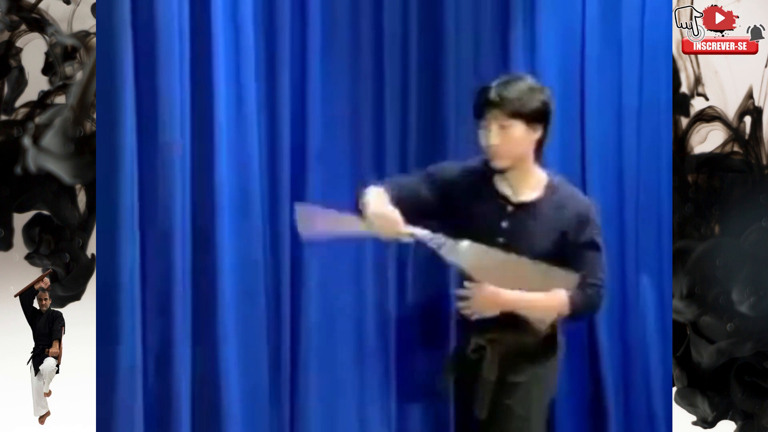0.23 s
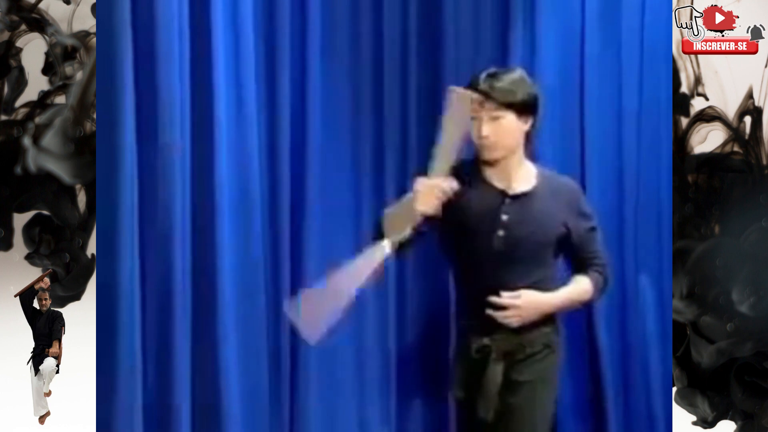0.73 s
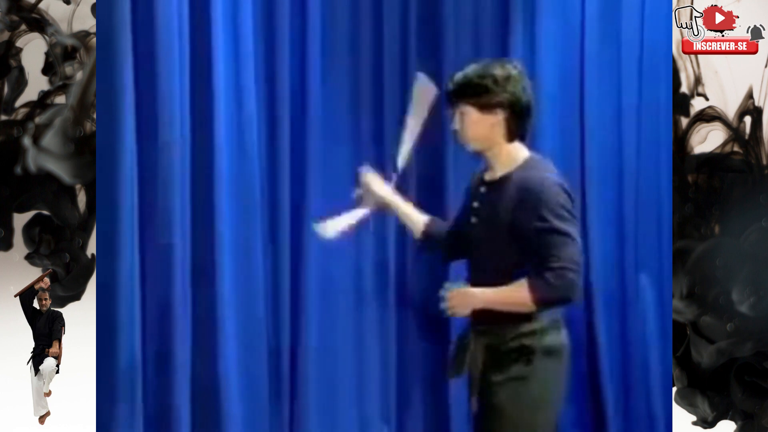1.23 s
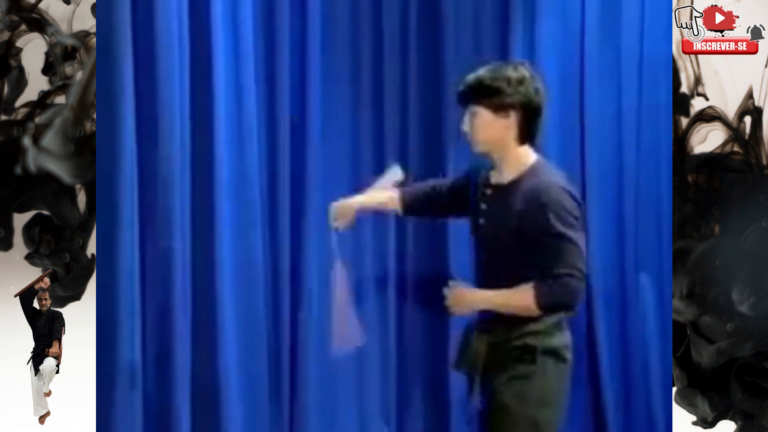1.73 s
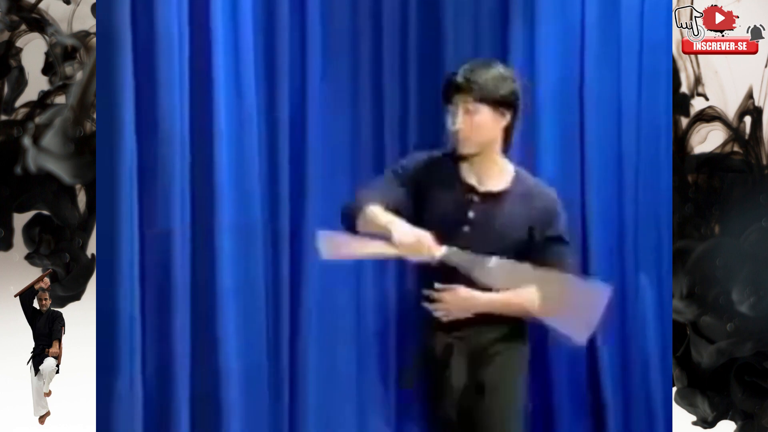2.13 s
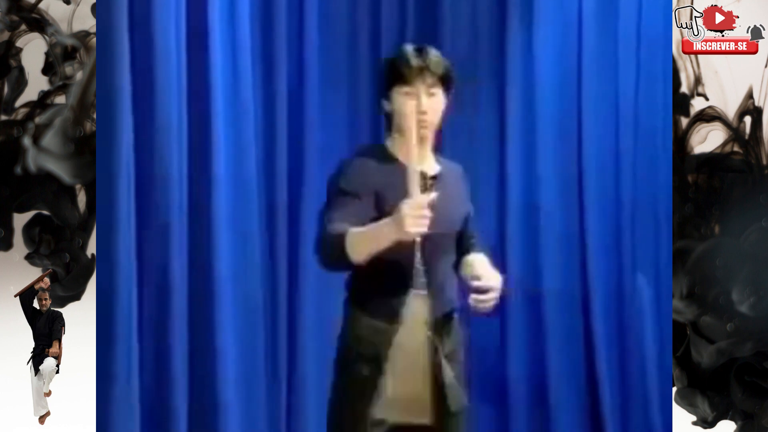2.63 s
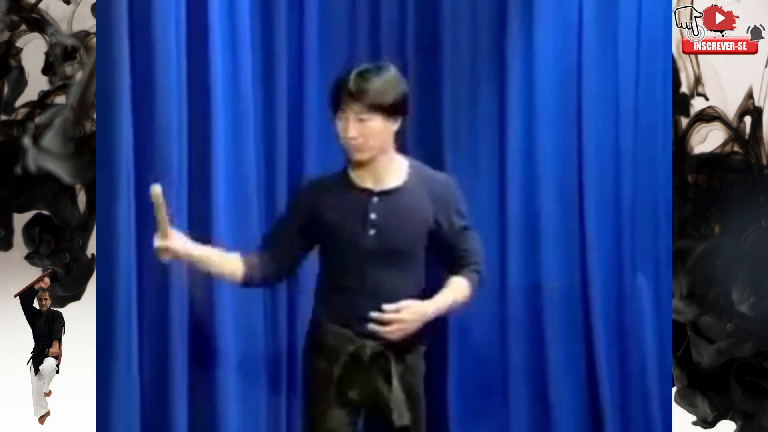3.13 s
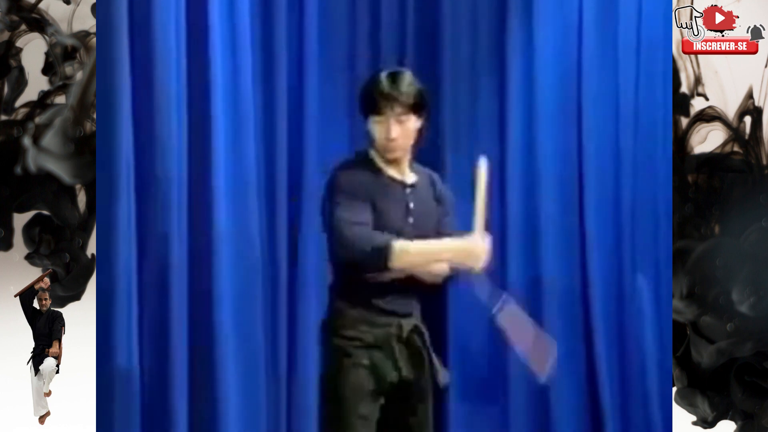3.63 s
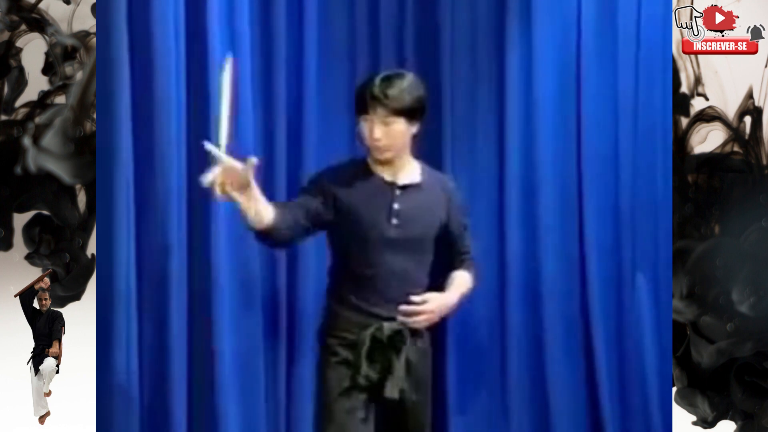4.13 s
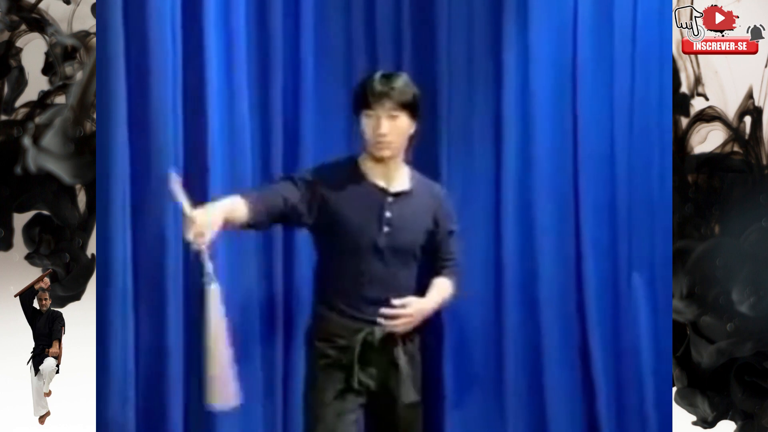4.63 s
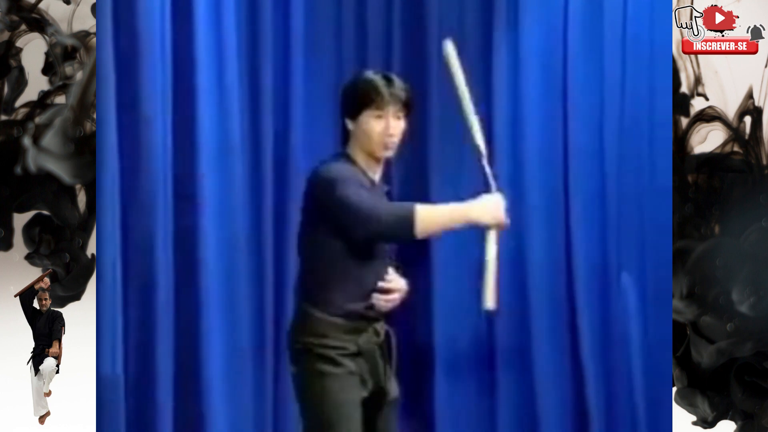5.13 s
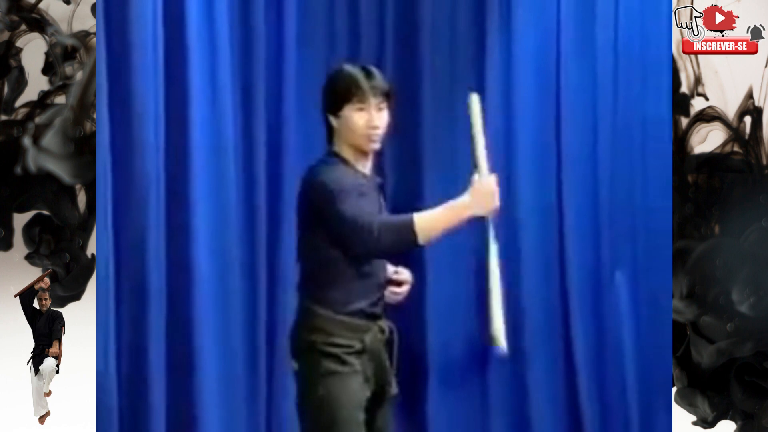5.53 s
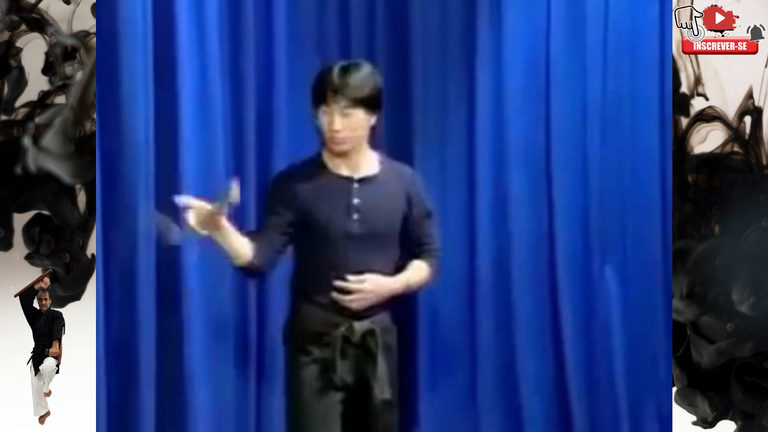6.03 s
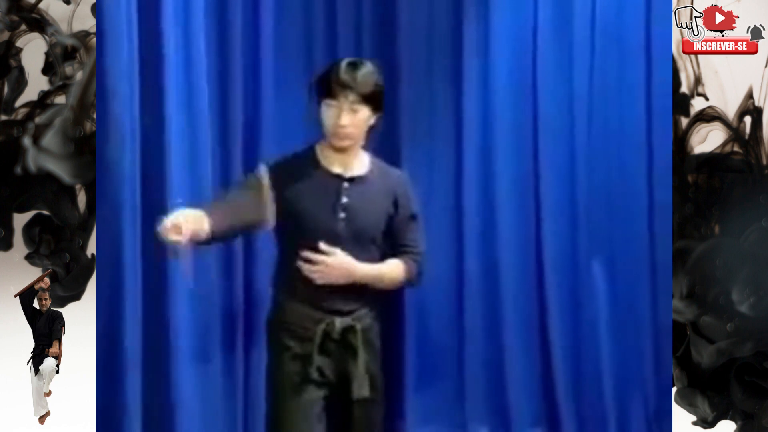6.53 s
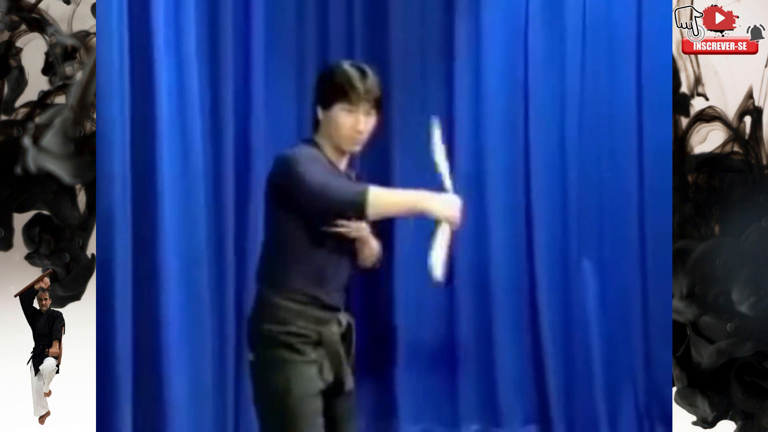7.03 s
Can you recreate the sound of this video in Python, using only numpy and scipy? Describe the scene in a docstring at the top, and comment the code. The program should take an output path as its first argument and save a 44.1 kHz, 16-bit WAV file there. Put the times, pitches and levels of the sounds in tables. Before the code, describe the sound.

A pair of wooden sticks joined by a short chain is swung quickly and caught. Sharp metallic clacks, dry chain rattle and tiny swivel squeaks come in uneven bursts, with occasional soft hand thuds and woody knocks. Brief gaps expose low ventilation noise and mains hum. One fairly close microphone in a small indoor room with short reverberation; the level dips slightly after loud hits.

```python
"""Chain-linked sticks in a curtained room

Two wooden sticks on a short chain are whirled and caught, heard by one microphone.
Swivels squeak by stick-slip; knocks and fine ticks excite resonances of links and wood; the hand thuds softly.
Shaped ventilation noise, mains hum made of sines and white hiss lie beneath.
All of it ducks when the recorder turns its gain down."""
import sys
import numpy as np
from scipy import signal
from scipy.fft import rfft, irfft, next_fast_len
from scipy.io import wavfile
from scipy.ndimage import uniform_filter1d

SR = 44100
rng = np.random.default_rng(int(sys.argv[2]) if len(sys.argv) > 2 else 0)


def wrap_up_sound(samples):
    """Save the sound to the file named by the first command line argument, as 16-bit audio."""
    columns = np.atleast_2d(samples).T
    # keep every value between -1 and 1, then stretch to whole-number steps
    tamed = np.clip(columns, -1, 1)
    steps = np.round(tamed * 32767).astype(np.int16)
    wavfile.write(sys.argv[1], SR, steps)


N = 320607  # samples

# Ventilation spectrum, shape only: (frequency [Hz], relative density [dB per Hz])
AIR_SPECTRUM = [(20, -15), (30, -25), (121, 0), (273, -9.5), (345, -2.5), (632, -8.5), (962, -8),
                (1500, -19.5), (3060, -17.5), (6900, -83)]
# Mains hum at the microphone: (frequency [Hz], rms level [dB])
HUM_PARTIALS = [(30, -54.5), (60, -43.5), (120, -41), (180, -51), (240, -52.5), (1440, -52.5)]
# Jerks that shake the chain loose, before the trims in rattle():
# (time [s], treble level [dB], chain ring over treble [dB], treble settling rate [dB/s])
JERKS = [(0.0, -27, 1.5, 83), (0.21, -36, 4, 103.5), (0.289, -30.5, -6, 262), (0.489, -35.5, 3, 150),
         (0.59, -42.5, 4, 98), (1.025, -21, -3.5, 240), (1.156, -19, -4.5, 202), (1.225, -32, -4.5, 96),
         (1.541, -25, 8.5, 238), (1.72, -29, -1.5, 54), (1.848, -23.5, -6.5, 85), (2.07, -32, -1, 400),
         (2.201, -36, -2.5, 68.5), (2.272, -36, -25, 123), (2.488, -35.5, 4.5, 267), (2.799, -36, 3.5, 397),
         (2.938, -31, 2.5, 73), (3.027, -14.5, -6, 166), (3.34, -71.5, 26.5, 60), (3.482, -45, 2, 40),
         (3.63, -23, -7, 356), (3.78, -70, 3, 246), (3.879, -36.5, 1.5, 270), (4.0, -52.5, 13.5, 94),
         (4.169, -49.5, 7.5, 114), (4.43, -31, 2, 32), (4.708, -18, -3.5, 233), (4.86, -31, 1, 70),
         (4.976, -38.5, 7, 120), (5.06, -33.5, -5, 120), (5.118, -33, -2, 100), (5.199, -34.5, -19, 50),
         (5.36, -30.5, 3, 144), (5.672, -39, -0.5, 17), (5.839, -37, 10.5, 211), (5.957, -20.5, -6, 106),
         (6.2, -45, 8, 93), (6.378, -31, 3, 63), (6.64, -26, 0.5, 99.5), (6.678, -25.5, -5, 202),
         (6.73, -29, -1.5, 165), (6.82, -35, -11, 93), (6.938, -29, 3.5, 128), (7.05, -28.5, -4, 116),
         (7.22, -39, 5.5, 100)]
# Link resonances, values for one pass of the filter: (frequency [Hz], width [Hz], gain [dB])
CHAIN_MODES = [(2157, 1130, -1), (2429, 774, 4.5), (3856, 1680, 6.5), (4740, 1170, -5), (5510, 476, -1)]
# High link resonances, likewise: (frequency [Hz], width [Hz], gain [dB])
HIGH_LINK_MODES = [(6190, 730, 3), (7840, 530, 4), (8540, 1200, 5), (9780, 2130, -0.5), (11100, 930, -13),
                   (12140, 3800, -2)]
# Stick resonances, likewise: (frequency [Hz], width [Hz], gain [dB])
WOOD_MODES = [(562, 100, 2.5), (755, 94, 4), (934.5, 131, 4), (1296, 640, -3.5)]
# The hand closing on a stick: (time [s], level [dB], pitch [Hz])
THUDS = [(2.033, -25, 367), (2.848, -14, 420), (3.518, -4.5, 460), (4.4, -21, 228), (4.7, -19.5, 427),
         (5.332, -17.5, 514), (6.352, -16.5, 350), (6.716, -18.5, 412)]
# Links and caps knocking, before the trims in clacks():
# (time [s], treble level [dB], chain ring over treble [dB], wood over treble [dB])
CLACKS = [(0.0326, 2.5, 7.5, -36), (0.4214, -33, 18, -7), (0.4514, -38, 4, 12), (0.5154, -42, 12, -2),
          (1.0182, -10.5, -10, -39), (1.15, -12, 3, -32), (1.217, -3, -2, -21), (1.304, -26.5, 23, -16),
          (1.501, -30, 27, -14), (1.5273, -14, 9, -29.5), (1.7275, -19.5, 20, -10), (1.7729, -8, 16.5, -32),
          (1.7887, 1, -17, -18), (1.846, -2, 8, -24), (1.9476, -16, 11.5, -0.5), (2.026, -18, 21.5, -6.5),
          (2.1402, -4.5, 4.5, -14), (2.215, -13, 5.5, -14), (2.7908, -18.5, -9, -5.5), (2.916, -6, -2, -12),
          (2.9434, -13.5, 10, -19), (3.013, -2, -14, -31), (3.3313, -23, -9, 6.5), (3.5378, -21, -19, 3.5),
          (3.7713, -14, -44, -11), (3.8754, -18, 4, 1), (3.9052, -24, -4, -7), (4.1495, -37, 23, -9),
          (4.333, -31, 12, -14), (4.4277, -1, 0, -16.5), (4.521, -21, 14, 2), (4.7063, -0.5, 6.5, -36),
          (4.8335, -17, 14, 5), (4.866, -6.5, 4, -11), (4.97, -25, 0, 4), (5.0597, -25.5, 10, 4),
          (5.1221, -19, -5, 5), (5.336, -18.5, 17, 6.5), (5.7786, -30.5, -4, 11), (5.8278, -10, 7, -20),
          (5.9573, -1, -25, -12.5), (6.0076, -1.5, -4, -11), (6.195, -37, 22.5, -2), (6.263, -36, 7, 10),
          (6.3124, -42, -6.5, 24), (6.34, -13.5, 9.5, -6), (6.6811, -9, 8, -25), (6.7232, -5.5, 9, -24),
          (6.9271, -19.5, 15, 4), (7.0536, -20, 14, -27), (7.0806, -20, 4, 7)]
# Spectrum of a knock's crack, shape only: (frequency [Hz], relative level [dB])
CRACK_SPECTRUM = [(1200, -25), (3000, -24), (6000, -5.5), (9000, -11), (11000, -17), (15000, -20.5)]
# Clear slips of swivels and links, before pitch and grip waver:
# (time [s], length before the decay [s], mean pitch [Hz], level of the fundamental [dB])
SQUEAKS = [(0.0, 0.0043, 3280, -14), (0.0, 0.023, 2735, -20.5), (0.019, 0.013, 4900, -15),
           (0.027, 0.0071, 6370, -11.5), (0.031, 0.0037, 2744, -3.5), (0.142, 0.012, 4630, -19.5),
           (0.165, 0.023, 5660, -26), (0.192, 0.037, 2370, -17), (0.219, 0.0099, 934, -20),
           (0.226, 0.015, 4040, -17.5), (0.282, 0.0077, 4140, -6.5), (0.47, 0.014, 4530, -26),
           (0.482, 0.01, 6450, -19), (0.5, 0.0068, 6480, -15.5), (0.609, 0.009, 2640, -25),
           (0.637, 0.0065, 896, -24.5), (0.741, 0.016, 2376, -21), (0.755, 0.023, 2500, -22.5),
           (0.858, 0.0064, 4125, -13.5), (0.97, 0.0078, 4170, -27), (1.017, 0.0078, 4850, -15),
           (1.025, 0.022, 4010, -14.5), (1.06, 0.0053, 4170, -13), (1.155, 0.0071, 4400, -18),
           (1.156, 0.01, 2423, -14.5), (1.156, 0.011, 773, -23.5), (1.216, 0.018, 4660, -9),
           (1.386, 0.0038, 2440, -11), (1.43, 0.0057, 2510, -19.5), (1.524, 0.0045, 3860, -8.5),
           (1.528, 0.0044, 2570, 6.5), (1.56, 0.0074, 2740, -5), (1.604, 0.0046, 4330, -15),
           (1.612, 0.015, 4736, -1.5), (1.702, 0.0074, 3960, -14), (1.712, 0.0041, 4980, -10),
           (1.771, 0.0015, 4094, -2.5), (1.842, 0.012, 2680, -19), (1.842, 0.015, 5540, -13.5),
           (1.843, 0.015, 4630, -12), (1.903, 0.026, 3920, -21.5), (1.91, 0.02, 4840, -16.5),
           (1.965, 0.0035, 5620, -7.5), (1.98, 0.005, 5220, -9.5), (2.022, 0.0078, 3530, -7.5),
           (2.026, 0.012, 1890, -21), (2.034, 0.024, 904, -19.5), (2.131, 0.0065, 4450, -14.5),
           (2.167, 0.032, 4560, -16), (2.211, 0.0055, 4270, -9.5), (2.228, 0.017, 4750, -19),
           (2.248, 0.01, 4840, -12), (2.259, 0.026, 6270, -17.5), (2.305, 0.017, 4230, -24),
           (2.343, 0.016, 6480, -26), (2.461, 0.0058, 2700, -16), (2.465, 0.017, 4280, -13.5),
           (2.513, 0.0072, 2320, -21), (2.69, 0.025, 2400, -30), (2.714, 0.023, 2395, -19.5),
           (2.87, 0.0063, 4160, -13.5), (2.933, 0.011, 792, -23), (3.005, 0.0097, 9710, -20),
           (3.021, 0.0071, 2770, -9), (3.021, 0.009, 4480, -5), (3.057, 0.0054, 4880, -8),
           (3.06, 0.0057, 2766, -12), (3.074, 0.0097, 4480, -2), (3.08, 0.0051, 8640, -16),
           (3.081, 0.0091, 2600, -11), (3.088, 0.014, 4460, -1.5), (3.47, 0.0071, 2910, -26),
           (3.471, 0.0097, 5650, -24.5), (3.579, 0.0038, 5580, -10.5), (3.607, 0.016, 4510, -12.5),
           (3.628, 0.0079, 4130, -9), (3.638, 0.02, 4410, -14), (3.709, 0.0078, 2520, -16),
           (3.872, 0.0069, 2280, -25), (3.901, 0.0059, 9670, -25), (3.901, 0.011, 2815, -22.5),
           (3.938, 0.0042, 835, -19), (3.99, 0.014, 3730, -17.5), (4.009, 0.0073, 4600, -22),
           (4.147, 0.011, 2430, -20.5), (4.28, 0.012, 6000, -35), (4.425, 0.0042, 3710, -5),
           (4.429, 0.0072, 2657, -1), (4.444, 0.0036, 3950, -11), (4.449, 0.0077, 2474, -8),
           (4.461, 0.0035, 2600, -5), (4.52, 0.032, 7570, -25.5), (4.583, 0.034, 6350, -25),
           (4.618, 0.026, 6900, -24.5), (4.697, 0.018, 920, -18), (4.701, 0.01, 3120, -17),
           (4.702, 0.007, 12800, -15), (4.708, 0.02, 2370, -21), (4.721, 0.0072, 5200, -13),
           (4.761, 0.0079, 857, -19.5), (4.831, 0.017, 2360, -21.5), (4.849, 0.02, 800, -27),
           (4.862, 0.007, 3570, -15.5), (4.862, 0.019, 5460, -14.5), (4.923, 0.0071, 4040, -20),
           (4.938, 0.0069, 886, -22), (4.97, 0.0068, 3250, -20), (4.978, 0.011, 2386, -19),
           (4.98, 0.0074, 986, -20.5), (5.054, 0.0039, 4400, -16), (5.116, 0.0049, 4220, -19),
           (5.118, 0.0035, 2350, -11.5), (5.193, 0.013, 4910, -15), (5.204, 0.033, 4190, -19),
           (5.205, 0.02, 6080, -13), (5.274, 0.02, 6440, -26), (5.363, 0.011, 2723, -4),
           (5.376, 0.0052, 2443, -2.5), (5.41, 0.013, 4150, -17.5), (5.506, 0.012, 4486, -11),
           (5.49, 0.019, 6040, -26.5), (5.677, 0.033, 567.7, -18.5), (5.74, 0.015, 570, -35),
           (5.776, 0.0036, 4060, -16), (5.829, 0.011, 3740, -17), (5.848, 0.0036, 3790, -15),
           (5.954, 0.0075, 7800, -7), (5.97, 0.019, 6130, -18), (6.001, 0.0048, 2480, -8),
           (6.005, 0.0056, 9150, -14), (6.004, 0.0073, 4600, -12), (6.015, 0.012, 5100, -9.5),
           (6.028, 0.017, 4750, -4.5), (6.05, 0.0035, 5060, -30), (6.194, 0.0039, 3530, -21),
           (6.197, 0.012, 2524, -18.5), (6.376, 0.012, 2640, -3), (6.398, 0.0058, 2500, -3.5),
           (6.473, 0.012, 4700, -3.5), (6.496, 0.0057, 4710, -10), (6.54, 0.014, 5730, -24),
           (6.572, 0.0041, 4340, -15), (6.646, 0.023, 4220, -15.5), (6.664, 0.0067, 4860, -14),
           (6.665, 0.012, 4050, -15), (6.677, 0.0057, 2590, -7.5), (6.67, 0.009, 906, -14.5),
           (6.717, 0.011, 935, -21), (6.73, 0.015, 2633, -16.5), (6.815, 0.012, 3350, -18.5),
           (6.858, 0.0047, 3780, -21), (6.922, 0.018, 2315, -23), (6.934, 0.006, 3830, -12),
           (6.945, 0.014, 921, -17), (6.995, 0.021, 4420, -16), (7.033, 0.0042, 2310, -13.5),
           (7.039, 0.005, 5800, -6.5), (7.078, 0.0053, 2010, -12), (7.079, 0.0043, 2570, -13),
           (7.145, 0.0083, 4520, -20), (7.224, 0.0081, 3820, -15.5)]
# Overtones of a slip: (overtone frequency [Hz], level relative to the fundamental [dB])
OVERTONES = [(1100, -7.5), (1700, -18.5), (5000, -17.5), (9000, -24.5), (14000, -31)]
# Reverberation of the room: (frequency [Hz], time to fall by 60 dB [s])
ROOM_T60 = [(300, 0.53), (1000, 0.33), (2500, 0.26), (4500, 0.29), (7000, 0.15), (12000, 0.16)]
# Top of the microphone chain: (frequency [Hz], gain [dB])
MIC_EDGE = [(14900, 0), (15300, -14), (16000, -45)]

EDGE_HZ = 16300  # overtones stop here, and so does the final low-pass
AIR_DB, HISS_DB = -35, -50  # levels at the microphone
JERK_RISE_DB_PER_S, RING_LINGERS = 1085, 0.75  # the chain ring settles at this share of the treble's rate
IDLE_DB, IDLE_RING_DB = -60.5, 7.5  # the whirling chain between jerks: treble, and ring over treble
SMALL_SLIPS, SMALL_MEAN_S = 220, 0.0089  # number of chance slips and their mean length
SMALL_FOLLOW = .9  # share of the chain ring's level [dB] that they follow
SMALL_DB, SMALL_SPREAD_DB = 5, 4  # offset added to that share, and scatter either way
SMALL_DELAY_S, SMALL_DETUNE = .07, 0.0705  # mean delay after a jerk; greatest pitch scatter as a share


def amp(db):
    """Level law: converts decibels to an amplitude gain."""
    return 10 ** (np.asarray(db) / 20)


def evened(x):
    """Normalisation: scales a signal to unit rms."""
    return x / np.sqrt(np.mean(x ** 2) + 1e-20)


def read(points, hz):
    """Interpolation of a table along a logarithmic frequency axis."""
    f, value = np.transpose(points)
    return np.interp(np.log(hz + 1), np.log(f + 1), value)


def add(mix, s, sound):
    """Superposition: adds a sound to the mix at a time in seconds."""
    part = mix[round(s * SR):][:len(sound)]
    part += sound[:len(part)]


def colour(x, points):
    """Spectral shaping: multiplies the spectrum by a gain curve in dB."""
    size = next_fast_len(len(x))
    gain = amp(read(points, np.fft.rfftfreq(size, 1 / SR)))
    return irfft(rfft(x, size) * gain, size)[:len(x)]


def ring(x, modes):
    """Modal resonance: one drive excites parallel second-order resonators."""
    out = np.zeros(len(x))
    for hz, width, db in modes:
        b, a = signal.iirpeak(hz, hz / width, SR)
        out += amp(db) * signal.lfilter(b, a, x)
    return out


def wander(length, smooth):
    """Low-pass randomness: noise averaged twice over `smooth` samples, about unit rms."""
    noise = rng.standard_normal(length + 400)
    slow = uniform_filter1d(uniform_filter1d(noise, smooth), smooth)
    return evened(slow)[200:-200]  # drops the edges


def ventilation():
    """Broadband flow noise: random noise with a fixed spectrum and a gentle swell."""
    swell_db = AIR_DB + 2.47 * wander(N, 4000)
    return amp(swell_db) * evened(colour(rng.standard_normal(N), AIR_SPECTRUM))


def mains_hum():
    """Periodic interference: a sum of steady sines with random phases."""
    t = np.arange(N) / SR
    hum = np.zeros(N)
    for hz, db in HUM_PARTIALS:
        hum += amp(db) * np.sqrt(2) * np.sin(2 * np.pi * (hz * t + rng.random()))
    return hum


def amplifier_hiss():
    """Electronic noise: the microphone amplifier adds white Gaussian noise."""
    return amp(HISS_DB) * rng.standard_normal(N)


def shaking():
    """Exponential decay: each jerk rises fast and settles, its power adding to an idle level; in dB."""
    t = np.arange(0, N + 64, 64) / SR
    s, db, ring_db, settle = np.transpose(JERKS)[:, :, None]
    rise = JERK_RISE_DB_PER_S * np.minimum(t - s, 0)
    fall = settle * np.maximum(t - s, 0)
    treble = (amp(db + rise - fall) ** 2).sum(0) + amp(IDLE_DB) ** 2
    low = (amp(db + ring_db + rise - RING_LINGERS * fall) ** 2).sum(0)
    low += amp(IDLE_DB + IDLE_RING_DB) ** 2
    return [np.interp(np.arange(N) / SR, t, 10 * np.log10(power)) for power in (treble, low)]


def jingle(ticks, modes):
    """Modal excitation: each resonance gets a drifting share of the ticks as the links shift."""
    out = np.zeros(N)
    for mode in modes:
        drive = ticks * amp(5.5 * wander(N, 450))
        once = ring(drive, [mode])
        out += ring(once, [mode[:2] + (0,)])  # a second pass at 0 dB keeps the resonance narrow
    return evened(out)


def rattle():
    """Impact excitation: a grind of random ticks in clumps rings low and high modes of links and wood."""
    treble_db, low_db = shaking()
    happens = rng.random(N) < 7000 / SR  # on average 7000 ticks a second
    ticks = amp(1.2 * rng.exponential(1, N)) * rng.choice([-1, 1], N) * happens
    low = amp(low_db + 4.0) * jingle(ticks, CHAIN_MODES + WOOD_MODES)
    high = amp(treble_db - 2.5) * jingle(ticks, HIGH_LINK_MODES)
    clumps = amp(1.73 * wander(N, 150))
    return clumps * (high + low)


def thuds():
    """Damped soft impact: the hand gives a push of one or two cycles under a Gaussian envelope."""
    out, t = np.zeros(N), np.arange(700) / SR
    for s, db, hz in THUDS:
        envelope = np.exp(-((t * hz - 1.4) / 0.61) ** 2)
        add(out, s, -amp(db) * np.sin(2 * np.pi * hz * t) * envelope)
    return out


def clacks():
    """Impulse response: a short noise crack with a longer tail also rings the chain and the wood."""
    out, t = np.zeros(N), np.arange(2000) / SR
    for s, db, chain_db, wood_db in CLACKS:
        decay = np.exp(-t / .002) + .15 * np.exp(-t / .008)
        crack = rng.standard_normal(len(t)) * np.minimum(t / .0012, 1) * decay
        treble = colour(crack, CRACK_SPECTRUM)
        chain = ring(ring(crack, CHAIN_MODES), CHAIN_MODES)
        wood = ring(crack, WOOD_MODES)
        for part, level in ((treble, -2.5), (chain, chain_db - 5.5), (wood, wood_db + 3.5)):
            add(out, s, amp(db + level) * part / abs(part).max())  # each part scaled by its peak
    return out


def small_slips():
    """Load-dependent friction: chance slips near a mode trail the jerks, louder while the chain shakes."""
    jerk, delay, length, mode, detune, size = rng.random((SMALL_SLIPS, 6)).T
    modes = np.array(CHAIN_MODES + WOOD_MODES[2:3] + HIGH_LINK_MODES[:1])
    mode_hz = modes[(mode * len(modes)).astype(int), 0]
    hz = mode_hz * (1 + SMALL_DETUNE * (2 * detune - 1))
    jerk_s = np.array(JERKS)[(jerk * len(JERKS)).astype(int), 0]
    s = jerk_s + 2 * SMALL_DELAY_S * delay
    ring_db = np.interp(s * SR, np.arange(N), shaking()[1])
    db = SMALL_DB + SMALL_FOLLOW * ring_db + SMALL_SPREAD_DB * (2 * size - 1)
    return list(zip(s, SMALL_MEAN_S * (.5 + length), hz, db))


def squeaks():
    """Stick-slip oscillation: a harmonic tone of wavering pitch and grip swells in, then rings down."""
    out = np.zeros(N)
    pitch = wander(2 * N, 70).reshape(2, N)
    grip = wander(2 * N, 70).reshape(2, N)
    for row, (s, length, mean_hz, db) in enumerate(SQUEAKS + small_slips()):
        t = np.arange(round((length + 0.021) * SR)) / SR
        now = np.minimum(round(s * SR) + np.arange(len(t)), N - 1)
        hz = mean_hz * (1 + .03 * pitch[row % 2, now])  # neighbouring rows waver independently
        turn = 2 * np.pi * np.cumsum(hz) / SR
        tone = np.cos(turn)
        for k in (2, 3):
            tone += amp(read(OVERTONES, k * hz)) * np.cos(k * turn) * (k * hz < EDGE_HZ)
        rise = np.sin(np.pi / 2 * np.minimum(t / (.003 + .35 * length), 1)) ** 2
        decay = np.exp(-np.maximum(t - length, 0) / 0.0037)
        add(out, s, amp(db + 3.2 * grip[row % 2, now]) * rise * decay * tone)
    return out


def room(x):
    """Reverberant decay: sparse reflections of random sign, each band dying at its own rate."""
    taps = np.zeros(SR // 2)
    at = np.arange(200, len(taps) - 20, 20)
    taps[at + rng.integers(0, 20, len(at))] = rng.choice([-1., 1.], len(at))
    hz, t, bands = signal.stft(taps, SR, nperseg=256)
    decay = amp(-60 * t / read(ROOM_T60, hz)[:, None])
    tail = signal.istft(bands * decay, SR, nperseg=256)[1]
    return signal.fftconvolve(x, tail / np.linalg.norm(tail))[:N]


def scene():
    """Superposition of direct sound, room and background; one microphone feeds both channels."""
    background = ventilation() + mains_hum() + amplifier_hiss()
    sticks = rattle() + thuds() + clacks() + squeaks()
    return np.tile(sticks + amp(-7.0) * room(sticks) + background, (2, 1))


def record(dry):
    """Dynamic compression: gain falls fast on loud sound and recovers slowly; soft clip; band limit."""
    power_db = 10 * np.log10(abs(uniform_filter1d(dry[0] ** 2, 300)) + 1e-12)
    fall = np.arange(N) * 27.0 / SR  # the held level falls by 27 dB a second
    held_db = np.maximum.accumulate(power_db + fall) - fall
    over_db = np.maximum(held_db + 13.5, 0)  # excess above -13.5 dB
    ducked = dry[0] * amp(1.0 - 0.31 * uniform_filter1d(over_db, 200))
    clipped = ducked / (1 + abs(ducked / .93) ** 4) ** (1 / 4)
    low_pass = signal.firwin(511, EDGE_HZ, window=("kaiser", 9), fs=SR)
    out = signal.oaconvolve(colour(clipped, MIC_EDGE), low_pass, "same")
    return np.tile(out, (2, 1))


dry = scene()
out = record(dry)
wrap_up_sound(out)
```